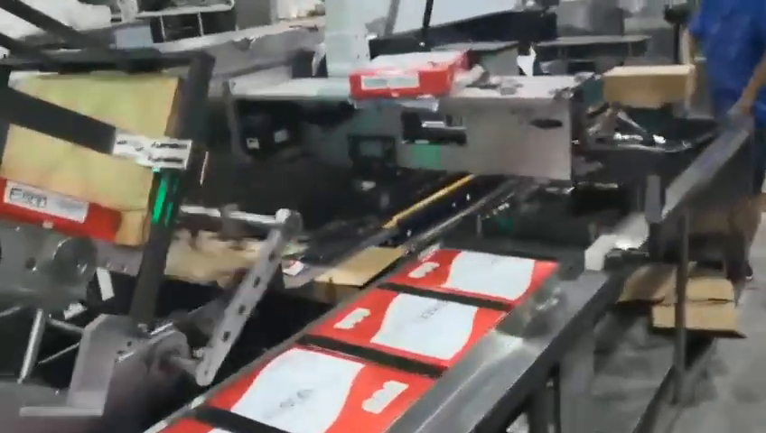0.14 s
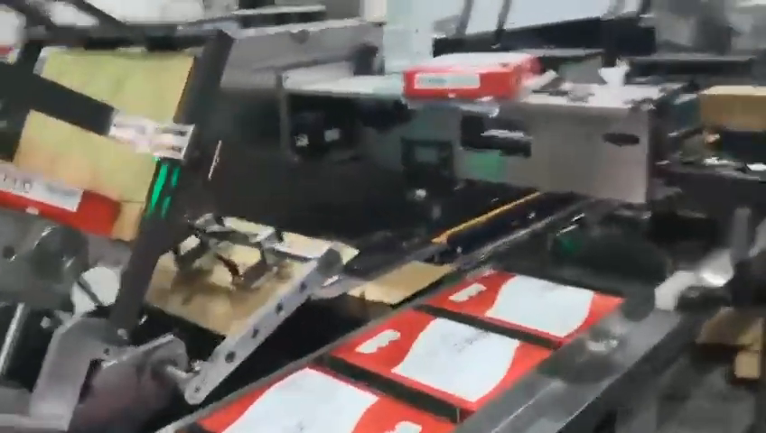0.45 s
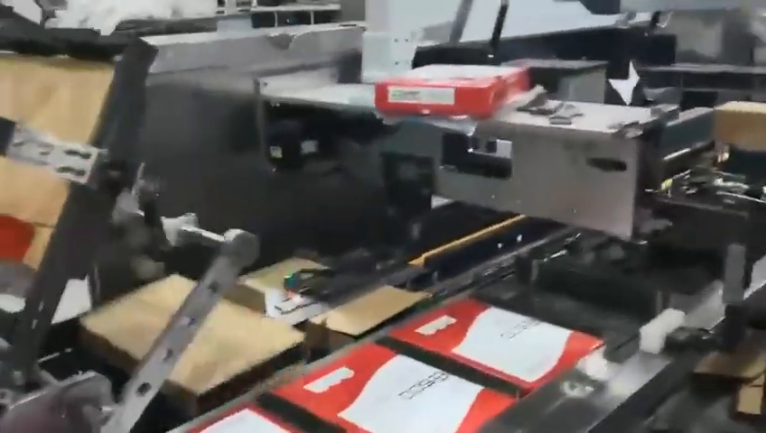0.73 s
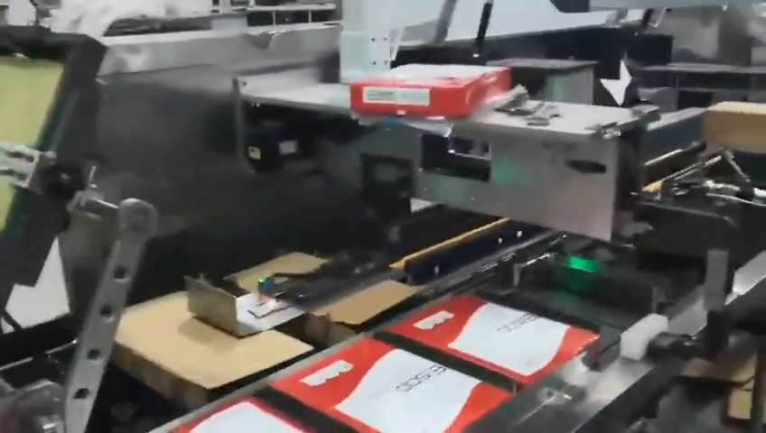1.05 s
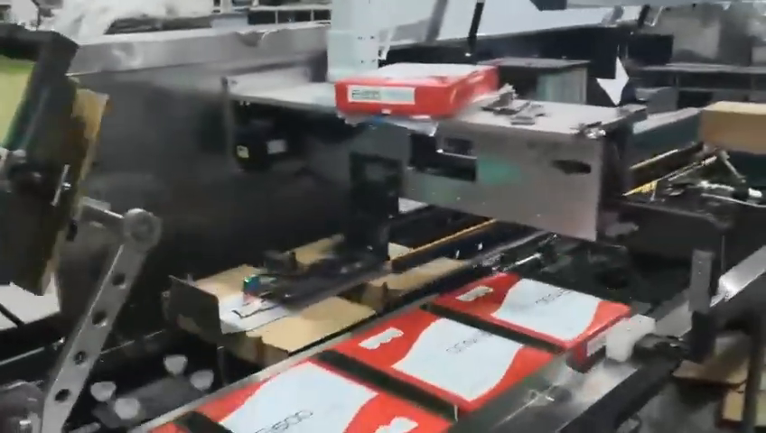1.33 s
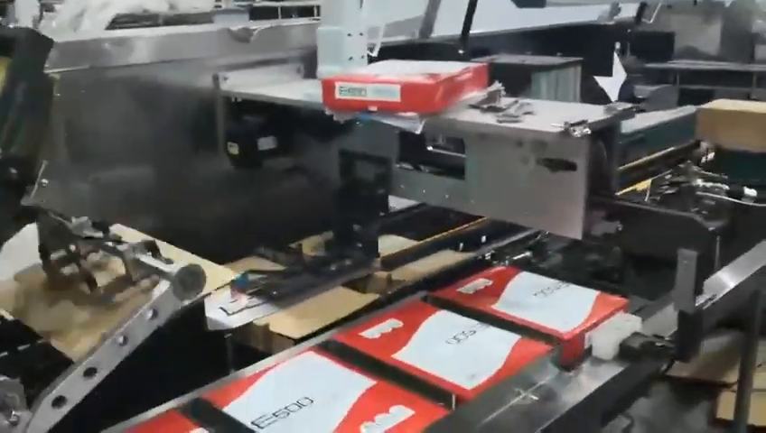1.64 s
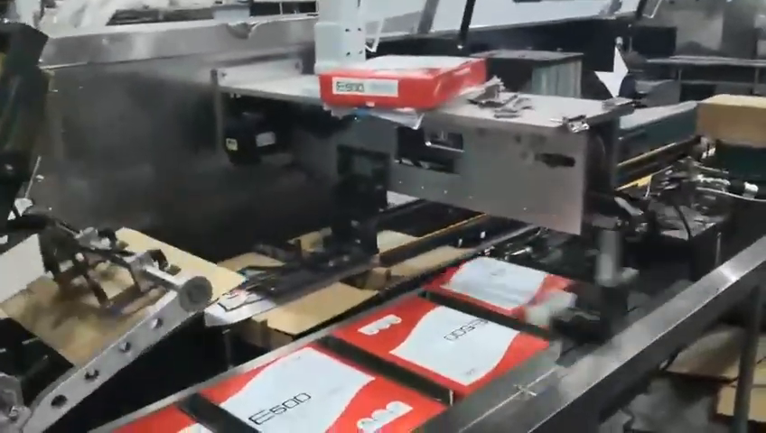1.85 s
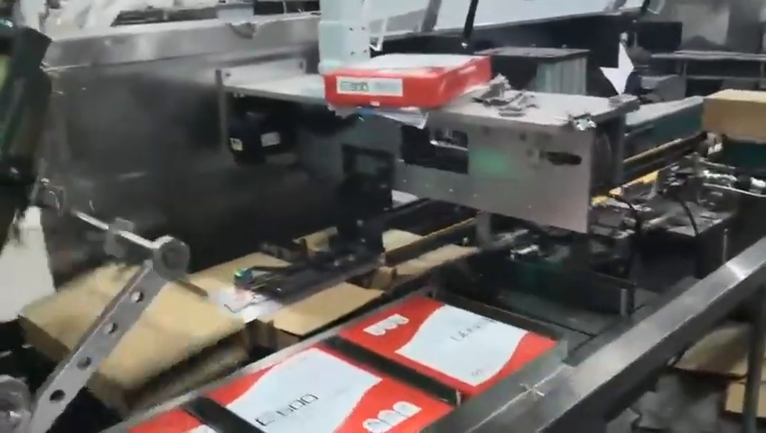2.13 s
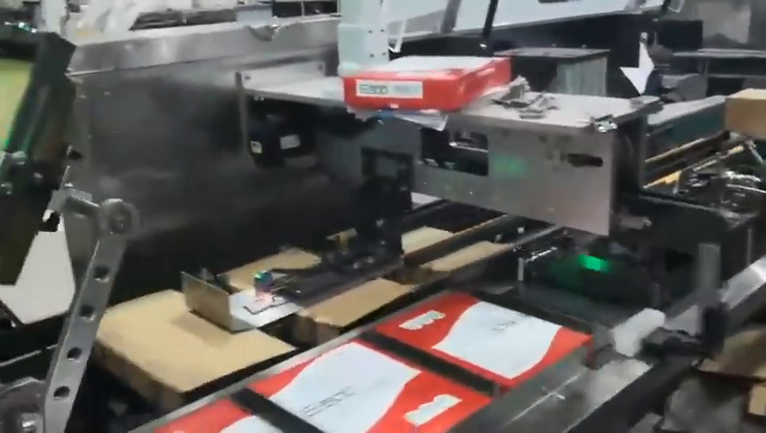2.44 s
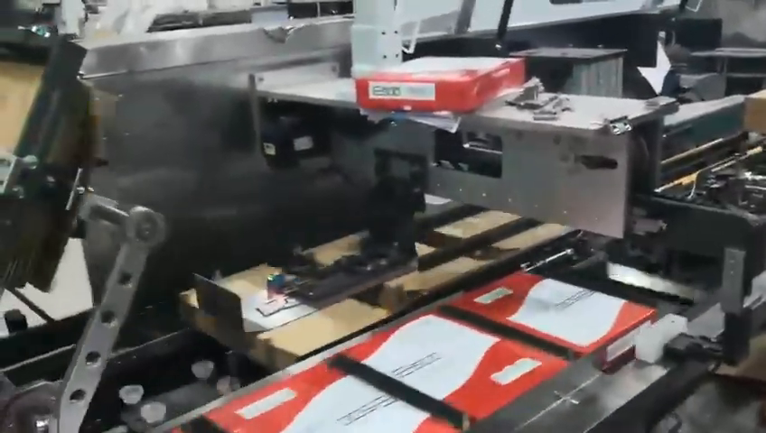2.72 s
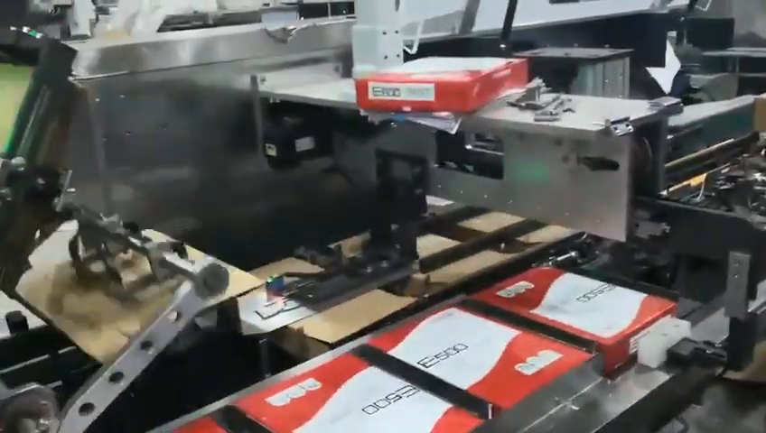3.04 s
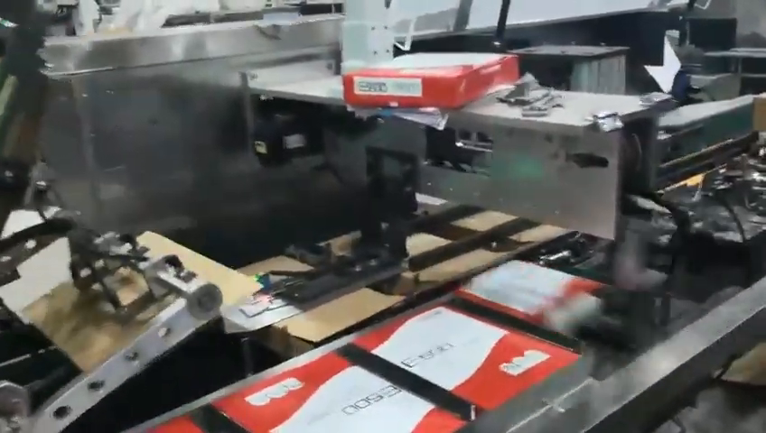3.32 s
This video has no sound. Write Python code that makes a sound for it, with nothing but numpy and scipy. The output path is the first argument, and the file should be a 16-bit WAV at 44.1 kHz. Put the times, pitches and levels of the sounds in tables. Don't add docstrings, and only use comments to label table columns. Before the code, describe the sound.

A cartoning machine cycles over a steady factory wash and uneven chain rumble and rattle. High whistling air bursts, each about 0.3 seconds, come at 0.14, 1.56 (loudest) and 2.98. Metal clacks crack at 0.17, 0.63, 1.2, 1.6, 2.05, 2.6, 3.03 and 3.47; low thumps land near 0.54, 0.87, 2.0, 2.3 and 3.4. Fainter puffs fill between; rattle surges at 0.9, 1.2 and 2.3; hall reverberation follows.

```python
import sys
import numpy as np
from scipy import signal
from scipy.fft import rfft, irfft
from scipy.io import wavfile
from scipy.ndimage import uniform_filter1d

SR = 44100
rng = np.random.default_rng(int(sys.argv[2]) if len(sys.argv) > 2 else 0)


def to_wav(sig):
    pcm = np.clip(np.atleast_2d(sig), -1, 1) * 32767
    pcm = np.round(pcm).astype(np.int16)
    wavfile.write(sys.argv[1], SR, pcm.T)


def makeup_ratio(level_db):
    decades = np.asarray(level_db, float) / 20
    return 10 ** decades


N = 153027

# freq_hz, likeness [-1..1]
COHERENCE = [(60, 1), (150, 0.87), (300, 1), (650, -0.27), (1400, .1), (4000, -0.019)]


def evened(x):
    return x / np.sqrt(np.mean(x ** 2) + 1e-20)


def read(points, hz):
    f, value = np.transpose(points)
    return np.interp(np.log(hz + 1), np.log(f + 1), value)


def shaped(x, points):
    hz = np.fft.rfftfreq(x.shape[-1], 1 / SR)
    return irfft(rfft(x) * makeup_ratio(read(points, hz)), x.shape[-1])


def smoothed(x, bands, frames):
    return uniform_filter1d(uniform_filter1d(x, size=bands, axis=-2), size=frames, axis=-1)


def resonate(x, hz, width):
    turn = np.exp(2j * np.pi * np.cumsum(hz * np.ones(x.shape[-1])) / SR)
    r = np.exp(-np.pi * abs(width) / SR)
    return 2 * (turn * signal.lfilter([1 - r], [1, -r], x / turn)).real


def body(x, peaks):
    total = 0
    for k, (hz, width, db) in enumerate(peaks):
        mode = resonate(resonate(x, hz, width), hz, width)
        total = total + (-1) ** k * makeup_ratio(db) * evened(mode)
    return evened(total)


def add(mix, s, sound, pan_db=0):
    part = mix[:, round(s * SR):][:, :len(sound)]
    part += makeup_ratio(np.array([[pan_db / 2], [-pan_db / 2]])) * sound[:part.shape[1]]


def hall():
    # freq_hz, difference_db
    side_lean = [(60, 1.5), (180, 0), (540, 4.5), (1630, -10.5), (4900, -5.5), (14700, 4.5)]
    # freq_hz, density_db (per Hz)
    spectrum = [(30, -16), (90, -3), (220, -3), (420, -11.5), (680, -16), (1150, -10.5), (2500, -6.5),
                (4300, -17), (7000, -16)]
    frames, hz = N // 256 + 5, np.fft.rfftfreq(1024, 1 / SR)
    a, b, c, d, patches = rng.standard_normal((frames, 513, 5)).T
    patches = evened(uniform_filter1d(uniform_filter1d(patches, size=10, axis=0), size=12, axis=1))
    same = np.clip(read(COHERENCE, hz), -1, 1)[:, None]
    left = a + 1j * b
    right = same * left + np.sqrt(1 - same ** 2) * (c + 1j * d)
    colour, lean = read(spectrum, hz), read(side_lean, hz) / 2
    z = np.array([left, right])
    z *= makeup_ratio(np.array([colour + lean, colour - lean])[:, :, None] + 2.58 * patches)
    return makeup_ratio(-26.5) * evened(signal.istft(z, nperseg=1024, noverlap=768)[1][:, :N])


def impacts(shape, per_s, spread_db):
    level = makeup_ratio(spread_db * np.minimum(rng.exponential(1, shape), 4))
    return level * (rng.random(shape) < per_s / SR)


def drive():
    # time_s, rumble_db, rattle_db
    load = [(0, -30, -37), (.3, -37.5, -38.5), (.5, -44, -39.5), (.6, -28, -34.5), (.8, -31, -40.5),
            (0.899, -25, -26.5), (1.079, -25.5, -35.5), (1.19, -28, -24.5), (1.33, -30.5, -35.5),
            (1.62, -34.5, -35.5), (1.921, -41.5, -37), (2.03, -25, -36), (2.2, -37.5, -41.5),
            (2.317, -21, -23), (2.5, -31, -33.5), (2.62, -30, -29), (2.799, -34.5, -35), (3.36, -44.5, -36)]
    # freq_hz, width_hz, level_db
    frame_modes = [(88, 49, 1), (121, 94, -2.5), (152, 29.3, 1), (218.3, 69, -2), (294.6, 54, -10),
                   (358, 122, -7)]
    # freq_hz, width_hz, level_db
    link_modes = [(317, 158, -3), (488, 530, -3.5), (1096, 344, 0), (1500, 990, 0.5), (1960, 1480, -1),
                  (2690, 470, -5)]
    t = np.arange(N) / SR
    s, rumble_db, rattle_db = np.transpose(load)
    knocks = impacts(N, 300, 1.7) * rng.choice([-1, 1], N)
    rumble = body(knocks, frame_modes) * makeup_ratio(np.interp(t, s, rumble_db))
    ticks = impacts((2, N), 900, 3.5)
    crossed = ticks + 0.15 * ticks[::-1]
    rattle = body(crossed, link_modes) * makeup_ratio(np.interp(t, s, rattle_db))
    return rumble + rattle * makeup_ratio(np.array([[-2.5], [2.5]]))


def thump(db, hz, cycles):
    sag, gain_db = 0.24, 2
    u = np.arange(4000) / SR * hz / max(cycles, 1)
    swell = np.sin(np.pi * np.minimum(u, 1)) ** 1.8
    return makeup_ratio(db + gain_db) * swell * np.sin(2 * np.pi * cycles * u * (1 + sag * (1 - u)))


def clack(db, hz, treble_db):
    # multiple (of pitch), level_db, t60_s
    modes = [(0.359, -13.5, .025), (.8, -6.5, 0.026), (1.002, 1, 0.027), (1.098, -4.5, 0.02),
             (1.4, -7.5, 0.019), (1.9, -10.5, .015)]
    # freq_hz, density_db (per Hz)
    crack_colour = [(1500, 19), (4000, 10), (7500, 16.5), (9500, 10.5), (15000, -17)]
    # freq_hz, density_db (per Hz)
    slap_colour = [(120, -50), (450, -10), (900, -5.5), (2000, 1), (3200, -8), (5000, -20.5)]
    scrape_t60_s, noise_t60_s = 0.02, 0.029
    t = np.arange(5000) / SR
    detune = rng.uniform(.93, 1.07, len(modes))
    detune[2] = 1
    ring = 0
    for (multiple, level_db, t60_s), d in zip(modes, detune):
        ring = ring + makeup_ratio(level_db - 60 * t / t60_s) * np.sin(2 * np.pi * multiple * d * hz * t)
    a, b, c = rng.standard_normal((3, len(t)))
    blow = 0.053 * a * makeup_ratio(-60 * t / scrape_t60_s) + (t == 0)
    ring = signal.oaconvolve(blow, ring * np.minimum(t / 0.0016, 1))[:len(t)]
    crack = evened(shaped(b, crack_colour)) * makeup_ratio(treble_db + 13)
    slap = evened(shaped(c, slap_colour)) * makeup_ratio(-6)
    noise = 0.5 * (crack + slap) * makeup_ratio(-60 * t / noise_t60_s)
    return makeup_ratio(db - 1.5) * (ring / abs(ring).max() + noise)


def puff(length, db):
    # freq_hz, density_db (per Hz)
    jet = [(1500, 16), (4000, 9.5), (7500, 14), (9300, 18), (11500, 11.5), (15000, 9)]
    t = np.arange(10000) / SR
    hiss = evened(shaped(rng.standard_normal(len(t)), jet))
    start = np.minimum(t / min(0.012, .3 * length), 1)
    return makeup_ratio(db) * hiss * start * makeup_ratio(-250 * np.maximum(t - length, 0) - 3.2 * t / length)


def vent(lead, length, db, hz):
    # multiple (of pitch), width_hz, level_db
    nozzle = [(1.0, 510, 6.5), (.53, 440, -8.5), (1.15, 440, -9), (1.42, 530, -5), (1.97, 900, -6),
              (1.0, 1600, -8.5)]
    leak_db, swell_db, hold_s, blast_t60_s = -9, -2, 0.033, 0.033
    whistle_db, whistle_fade_db, whistle_width_hz = -13, -12.5, 290
    t = np.arange(22000) / SR
    a, b, c = rng.standard_normal((3, len(t)))
    opening_rise = 0.13 * np.exp(-(t / 0.011) ** 2)
    pressure_sag = 0.014 * np.exp(-t / 0.043)
    bend = hz * (1 + opening_rise + pressure_sag)
    rough = makeup_ratio(1.4 * evened(uniform_filter1d(c, size=90)))
    blast_end = lead + hold_s
    swell = swell_db * np.maximum(1 - t / blast_end, 0)
    decay = -60 * np.maximum(t - blast_end, 0) / blast_t60_s
    blast = body(a * rough, [(m * bend, w, g) for m, w, g in nozzle]) * makeup_ratio(swell + decay)
    whistle = body(b, [(bend, whistle_width_hz, 0), (bend / 2, whistle_width_hz, -7.5)])
    whistle = whistle * makeup_ratio(whistle_db + whistle_fade_db * t / length)
    leak = makeup_ratio(leak_db * np.clip((lead + 0.001 - t) / 0.0025, 0, 1))
    opening = np.minimum(t / 0.0082, 1) * leak
    shut = np.clip((length - t) / 0.0055, 0, 1)
    return makeup_ratio(db) * opening * (blast + whistle * shut)


def room(x):
    # freq_hz, t60_s
    decay = [(100, 0.73), (500, 0.43), (1500, 0.5), (8000, 0.36)]
    taps = np.zeros((2, SR))
    at = np.arange(300, SR - 20, 20) + rng.integers(0, 20, (2, (SR - 301) // 20))
    np.put_along_axis(taps, at, rng.choice([-1., 1.], at.shape), 1)
    hz, t, z = signal.stft(taps, SR, nperseg=1024)
    same = np.clip(read(COHERENCE, hz), -1, 1)[:, None]
    z = np.array([z[0], same * z[0] + np.sqrt(1 - same ** 2) * z[1]])
    tail = signal.istft(z * makeup_ratio(-60 * t / read(decay, hz)[:, None]), SR, nperseg=1024)[1]
    return signal.fftconvolve(x[None], tail / np.linalg.norm(tail[0]), axes=1)[:, :N]


def delayed(x, seconds):
    return np.pad(x, (round(seconds * SR), 0))[:N]


def scene():
    # start_s, peak_db, pitch_hz, cycles
    thumps = [(.188, -26, 404, 3.4), (0.254, -19.5, 162, 1.8), (0.274, -23.5, 304, 5),
              (.540, -10, 160, 3.2), (0.584, -18.5, 168, 4.5), (.870, -7.5, 171, 3.2),
              (.915, -21.5, 323, 4.5), (1.039, -23.5, 99, 2.7), (1.255, -23, 133, 3.8),
              (1.601, -20, 476, 4.4), (1.63, -23, 350, 3.4), (1.967, -12.5, 156.6, 4.2),
              (2.025, -14, 193, 3.35), (2.287, -8, 166.5, 4.15), (2.312, -15, 147, 1.96),
              (2.328, -17, 200.5, 6), (2.36, -21, 167, 2.7), (2.39, -23.5, 280, 5.3),
              (2.43, -22.5, 249, 3.6), (2.461, -21.5, 88.4, 6.7), (2.489, -21.5, 204, 3.4),
              (2.53, -21.5, 461, 4.7), (2.57, -23, 120, 2.4), (2.635, -21, 152, 6.8),
              (2.711, -21, 131, 2.1), (2.86, -25.5, 86.7, 5.5), (3.02, -21, 602, 4.4),
              (3.389, -11.5, 152, 3.5), (3.428, -14, 122.6, 3)]
    # start_s, peak_db, pitch_hz, treble_db
    clacks = [(.1705, -11, 1950, -11), (0.1736, -11, 1103, -4), (.178, -13, 1085, -10),
              (.184, -13, 1084, -9), (0.21, -18.5, 1600, -7), (.6305, -4, 1317, -11.5),
              (.6335, -10.5, 2600, -8.5), (.638, -16.5, 1200, -1), (.645, -17, 1230, -9),
              (.659, -14.5, 1290, -13), (0.808, -13.5, 1010, -32), (0.875, -13, 1610, -17),
              (.878, -11.5, 850, -15.5), (.945, -23, 1610, -31), (1.11, -19, 1430, -4),
              (1.124, -15, 2090, -10), (1.15, -14, 1560, -24), (1.167, -14.5, 1740, -28),
              (1.187, -4.5, 1477, -24), (1.193, -14.5, 1363, -22), (1.199, -13, 1597, -30),
              (1.2034, -10, 1427, -19.5), (1.218, -19, 1280, -27), (1.602, -10.5, 2153, -17),
              (1.608, -18, 1740, -20), (1.614, -5, 2293, -17.5), (1.619, -12.5, 1900, -20),
              (2.026, -17, 1555, -34), (2.044, -9.5, 1652, -8), (2.048, -14, 2400, -10.5),
              (2.236, -17, 1200, -39), (2.298, -14.5, 1600, -39), (2.529, -12, 1500, -10.5),
              (2.534, -9, 1074, -11.5), (2.540, -12, 1054, -20), (2.577, -14.5, 1210, -26),
              (2.591, -14, 1230, -24), (2.611, -7.5, 1454, -20), (2.619, -7, 1544, -17),
              (2.626, -7, 1500, -24), (2.676, -19, 1620, -17), (2.977, -19, 1900, -17),
              (3.021, -13, 2720, -11), (3.026, -11.5, 1820, -12), (3.035, -8, 2340, -34),
              (3.056, -21, 1860, -25), (3.419, -15.5, 1080, -7), (3.448, -11.5, 1060, -26),
              (3.4665, -5.5, 1500, -13.5)]
    # start_s, length_s, level_db
    puffs = [(0.077, 0.28, -30), (0.610, 0.0032, -30.5), (0.672, 0.09, -33.5), (0.98, 0.38, -31.5),
             (1.101, 0.025, -21), (1.143, 0.15, -35), (1.496, 0.047, -29), (2.224, 0.078, -31.5),
             (2.38, 0.24, -30.5), (2.53, 0.015, -30), (2.552, 0.056, -52), (2.908, 0.066, -31),
             (3.404, 0.063, -37)]
    # start_s, lead_s (leak before the blast), length_s (whistle), level_db, pitch_hz
    vents = [
        (.136, 0.0068, 0.34, -14.5, 5730),
        (1.556, .013, 0.32, -12, 5764),
        (2.977, 0.0126, .28, -14.5, 5817),
    ]
    air, near, low = np.zeros((3, 2, N))
    for s, *row in thumps:
        add(low, s, thump(*row))
    for s, *row in clacks:
        add(near, s, clack(*row), -7)
    for s, *row in puffs:
        add(air, s, puff(*row), 2.5)
    for s, *row in vents:
        add(air, s, vent(*row), 3.0)
    near_direct = np.array([delayed(near[0], 0.0006), near[1]])
    air_direct = np.array([air[0], delayed(air[1], 0.0009)])
    wet = makeup_ratio(-4) * near.mean(0) + makeup_ratio(-4) * low[0] + makeup_ratio(-4) * air.mean(0)
    return near_direct + air_direct + low + room(wet) + drive() + hall()


def roll_off(x):
    return signal.sosfilt(signal.butter(12, 15330, fs=SR, output="sos"), x)


def record(dry):
    # freq_hz, gain_db
    mic = [(7900, -0.06), (8300, -12.5), (8700, -12.5), (10000, -21), (11500, -20.5), (15000, -28)]
    # freq_hz, gain_db
    edge = [(15200, 0), (15400, -80)]
    limit = 1.15
    gate_low_hz, gate_high_hz, gate_percent, jitter_db = 8300, 15400, 64, 3
    picked_up = shaped(limit * np.tanh(dry / limit), mic)
    hz, _, z = signal.stft(picked_up, SR, nperseg=1024)
    band = (hz > gate_low_hz) & (hz < gate_high_hz)
    power = smoothed(abs(z[:, band]) ** 2, 8, 3)
    jitter = evened(smoothed(rng.standard_normal(power.shape), 6, 3))
    power = power * makeup_ratio(2 * jitter_db * jitter)
    threshold = np.percentile(power, gate_percent, axis=2, keepdims=True)
    strictness = np.where(hz[band] < 10400, 2.0, .8)[:, None]
    z[:, band] *= power > threshold * strictness
    gated = signal.istft(z, SR, nperseg=1024)[1][:, :N]
    finished = shaped(np.clip(gated, -1, 1), edge)
    return roll_off(finished)


dry = scene()
out = record(dry)
to_wav(out)
```